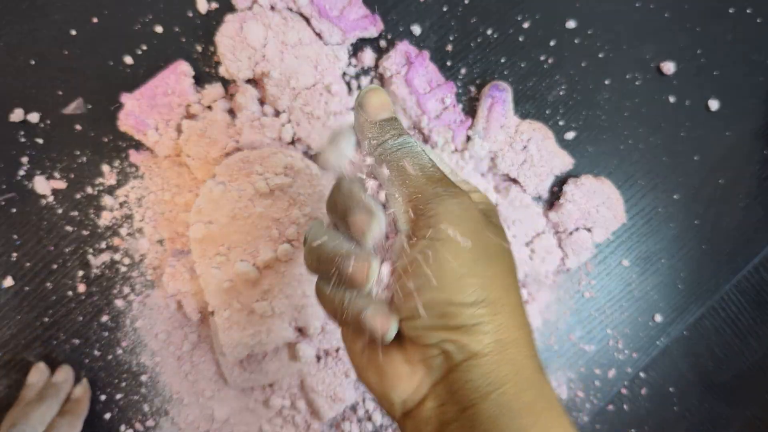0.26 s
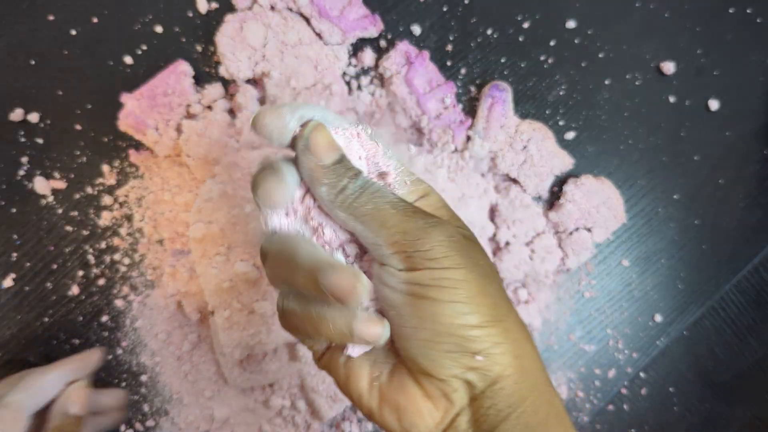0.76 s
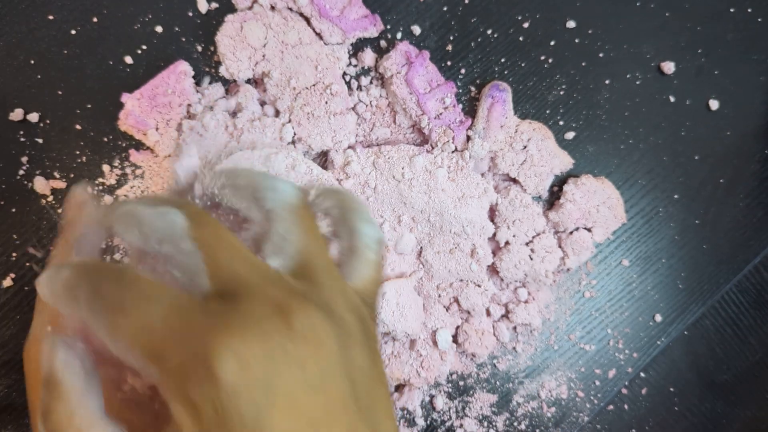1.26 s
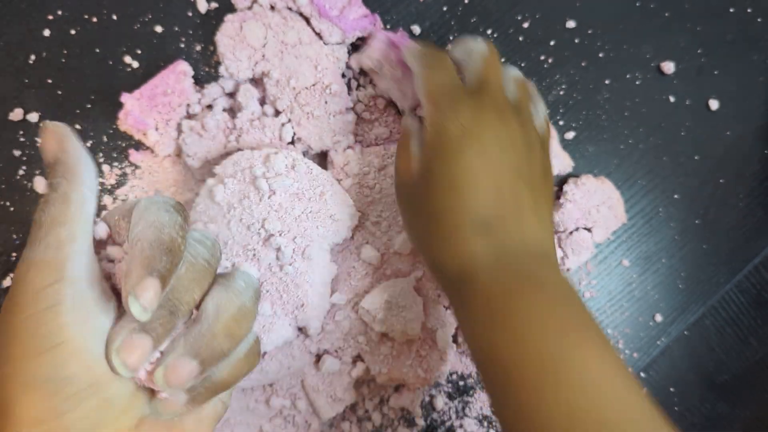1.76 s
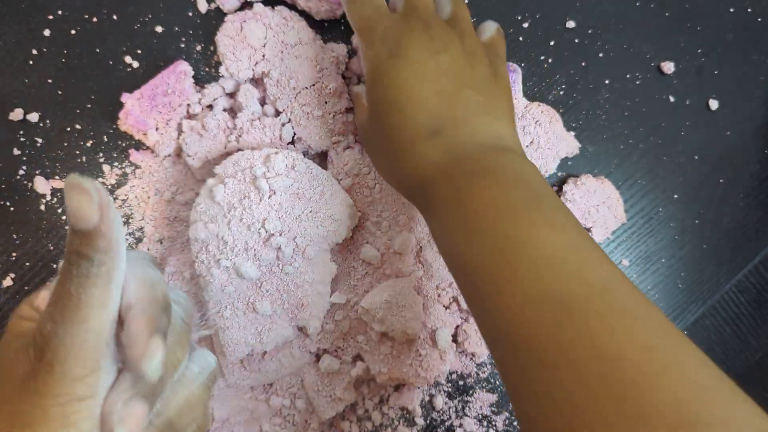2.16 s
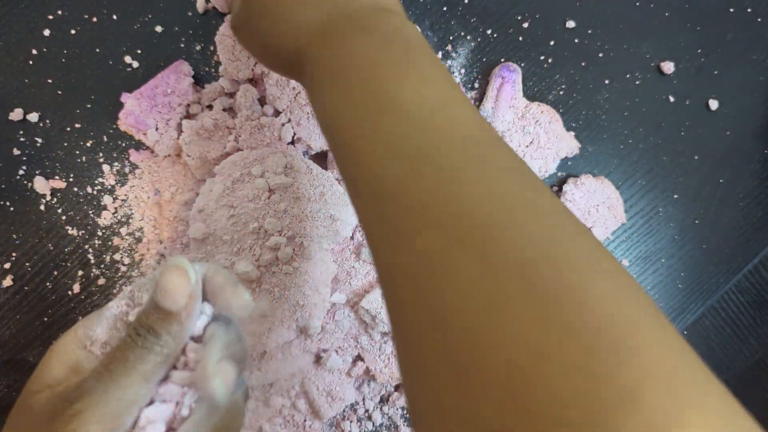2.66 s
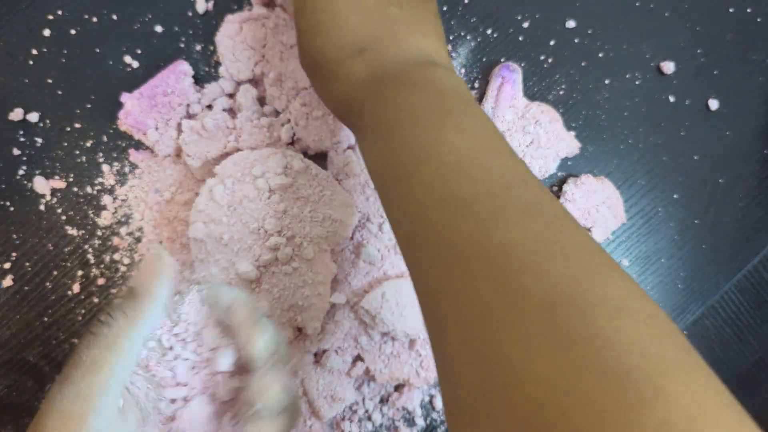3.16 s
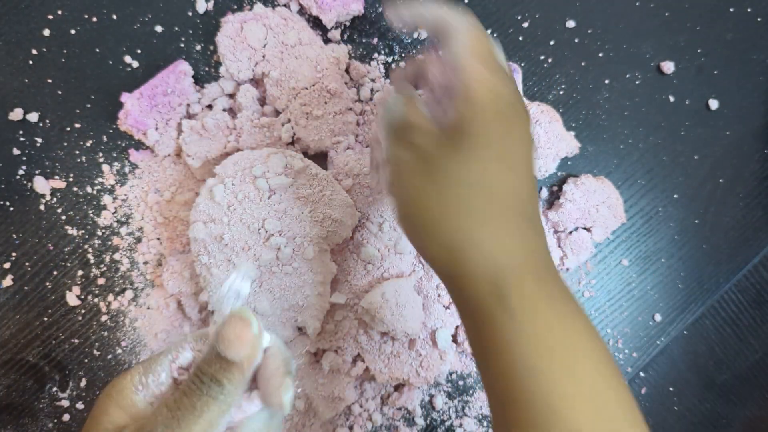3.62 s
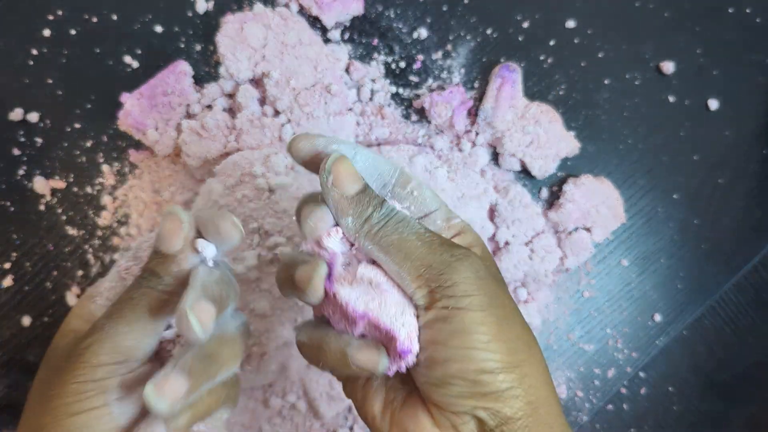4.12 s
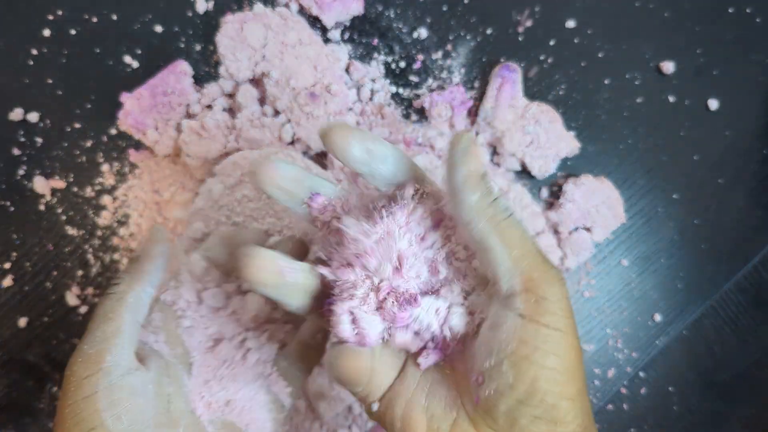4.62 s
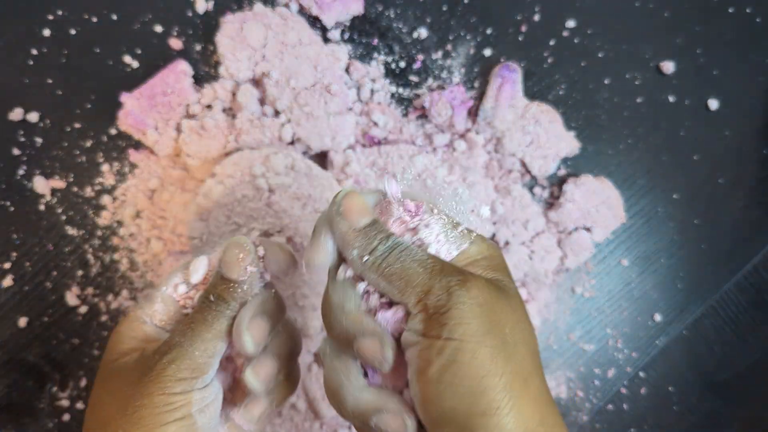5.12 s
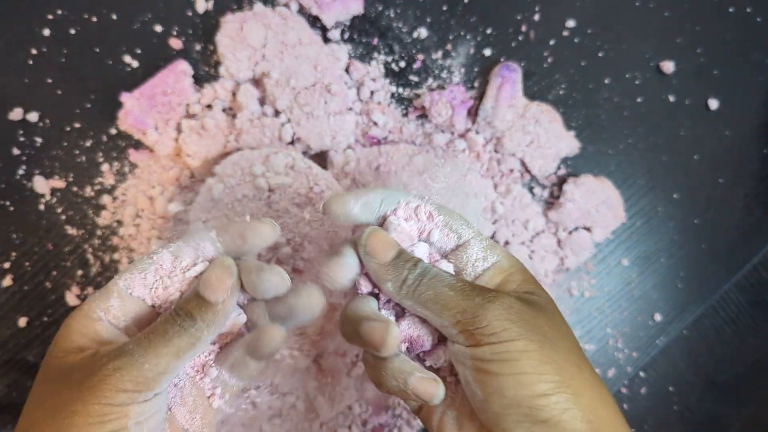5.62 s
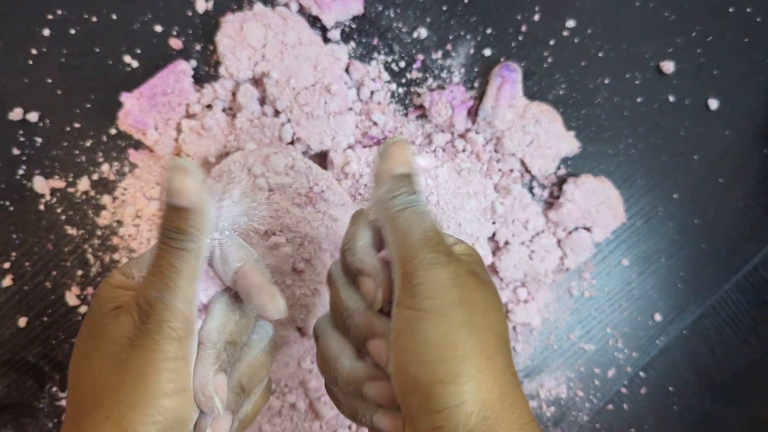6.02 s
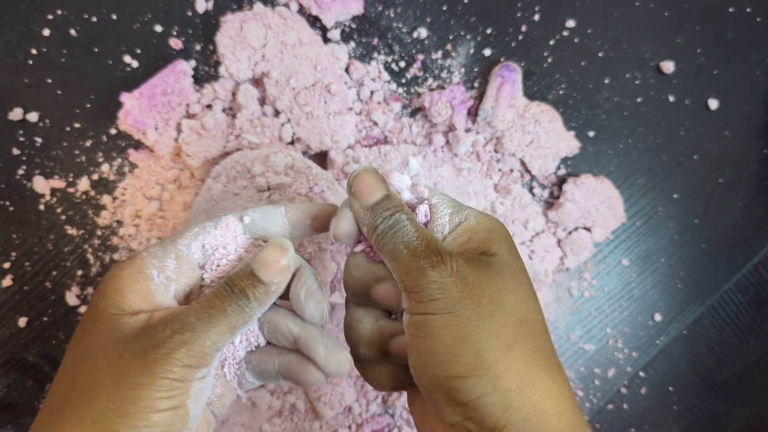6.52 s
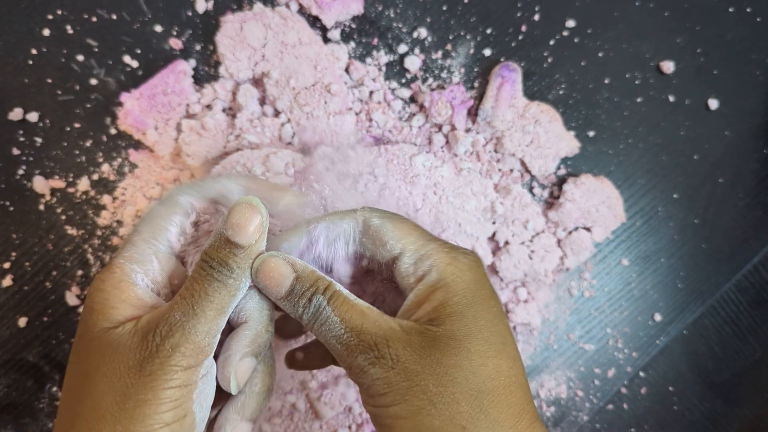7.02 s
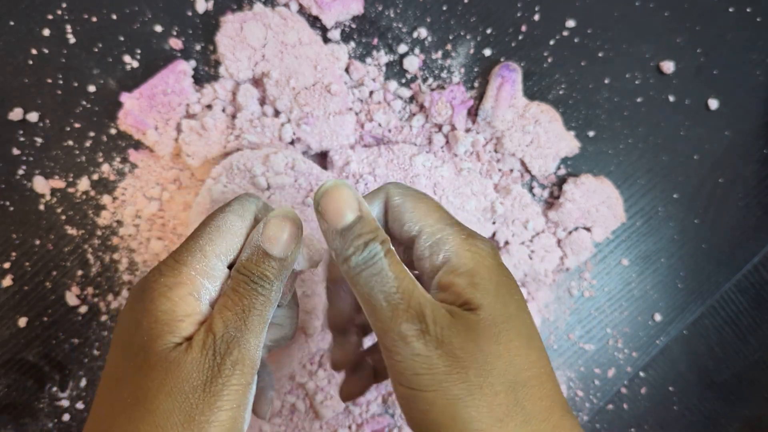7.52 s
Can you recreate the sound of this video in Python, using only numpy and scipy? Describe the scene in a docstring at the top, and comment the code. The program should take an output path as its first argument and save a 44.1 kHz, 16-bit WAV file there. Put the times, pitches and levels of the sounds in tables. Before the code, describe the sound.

Chalky chunks crack and crumble between fingers, heard very close and dry. Quick sharp crunches open the scene, then powder slides and the table thuds softly under hands. A new lump breaks with crisp, loud snaps and crumbs tick down. Squeezes continue as a granular, powdery crackle on and off, gradually thinner and quieter. Faint low room hum and soft hush lie beneath, with a very short indoor tail.

```python
"""Crushing dry powder by hand

Hands crush lumps of dry powder over a wooden table in a quiet room. Each lump gives way with crisp
snaps, then crumbles in a fine crackle while the powder rubs between the fingers: all random tiny clicks.
Crumbs tick; bumps and presses make the table thud and ring, built from filtered clicks and dying sines.
Behind it lie a low hum of wavering sines and a soft rush of filtered noise."""
import sys
import numpy as np
from scipy import signal
from scipy.fft import rfft, irfft, next_fast_len
from scipy.io import wavfile
from scipy.ndimage import uniform_filter1d, map_coordinates

SR = 44100
rng = np.random.default_rng(int(sys.argv[2]) if len(sys.argv) > 2 else 0)


def unload_audio(sound):
    """Save the sound as a 16-bit wav file, at the path given as the first command line argument."""
    columns = np.transpose(np.atleast_2d(sound))
    # keep every value between -1 and 1, then stretch to whole-number steps
    steps = np.round(np.clip(columns, -1, 1) * 32767)
    wavfile.write(sys.argv[1], SR, steps.astype(np.int16))


N = 343098  # length of the scene in samples


# Colours of the fine crackle and of the coarse rubbing.
# Each row: frequency in Hz, relative level in dB.
CRACKLE_COLOUR = [(800, -38), (2200, 2), (3500, 0.5), (4500, -0.5), (5500, -1), (6700, 2), (8300, 2),
                  (9700, -1), (11500, 0.5), (14000, -1.5), (16000, -10.5)]
RUBBING_COLOUR = [(100, -6), (210, -22.5), (345, 0), (440, -11), (600, -1.5), (850, 5), (1250, -1.5),
                  (1700, 1), (2200, -2.5), (3000, -6.5), (4500, -9), (9000, -19.5)]


def crumbling():
    """Squeezed powder breaks in clumps of micro-fractures and rubs between the fingers; small crumbs pop."""
    fine_gain, coarse_gain = squeezing()
    slips_db = 1.6 * wobble(80) + 0.28 * wobble(300)  # stick and slip
    dust = unit(amp(slips_db) * grains(rate=6000, spread_db=-0.5, size=N))
    rub_db = .5 * slips_db + 1.2 * wobble(110)
    rub = unit(amp(rub_db) * grains(rate=1800, spread_db=1.0, size=N))
    dust = nearby(dust, scatter_db=0.5, life=0.029)
    rub = nearby(rub, scatter_db=9.5, life=0.04)
    ticks = amp(-7) * chips(rate=400, hz=7000, octaves=.6, cycles=9, spread_db=4)
    pops = amp(-6.5) * chips(rate=480, hz=3000, octaves=.5, cycles=9, spread_db=4)
    breaking = unit(np.hypot(1, .7 * clumps(rate=170, life=.01, spread_db=3)))
    crackle = convolve(breaking * dust + ticks, colour(CRACKLE_COLOUR))
    rubbing = convolve(breaking * rub + pops, colour(RUBBING_COLOUR))
    crackle = shifting(crackle, depth_db=2.3)
    rubbing = shifting(rubbing, depth_db=2.4)
    return amp(1.0) * fine_gain * crackle + amp(-0.36) * coarse_gain * rubbing


# Squeezes of the hand. Each row: start in seconds, held for seconds, strength of the fine crackle in dB,
# coarse rubbing in dB over the crackle, swell in dB while held.
SQUEEZES = [(0.175, 0.036, -54, -16, 1), (0.25, 0.059, -50.5, 3.5, 2), (0.34, 0.1, -51.5, 1.5, 0.5),
            (0.45, 0.12, -58, 4.5, -7.5), (0.781, 0.16, -55, 0.5, -2), (0.98, 0.063, -57.5, 7.5, -2),
            (1.36, 0.115, -60, -6, -4), (1.53, 0.098, -55.5, 4.5, 6), (1.625, 0.07, -56.5, 9, -5.5),
            (1.709, 0.054, -54, 4.5, -6), (1.842, 0.056, -47.5, 7.5, -3.5), (1.91, 0.24, -63, 12, -13),
            (2.11, 0.2, -58.5, 7.5, 7.5), (2.62, 0.11, -65.5, 9, 4), (2.775, 0.16, -59, 8, 3.5),
            (2.89, 0.16, -53.5, 1, 4.5), (3.08, 0.093, -57.5, 9.5, 7), (3.346, 0.24, -57.5, 9, -5.5),
            (3.69, 0.11, -57, 3.5, -2), (4.074, 0.072, -55, -1.5, -1.5), (4.15, 0.28, -51.5, 1, 6),
            (4.56, 0.16, -62, 1.5, 1), (4.76, 0.18, -52, 0.5, -2), (4.96, .3, -55, 3.5, 0.5),
            (5.298, 0.11, -51.5, 1, -2), (5.44, 0.05, -58.5, 1.5, -0.5), (5.695, 0.15, -55, 0, 4.5),
            (5.885, 0.047, -51.5, 3.5, 1.5), (5.971, 0.092, -57, 7, 0.5), (6.135, 0.14, -63.5, 0.5, -11),
            (6.39, 0.077, -61, 5.5, 2.5), (6.475, 0.12, -56, 5, -2.5), (6.62, 0.088, -60, 4, 1),
            (6.71, 0.078, -58, 4.5, 1), (6.825, 0.043, -57.5, 5.5, -5.5), (7.019, 0.083, -55.5, -4.5, -1),
            (7.13, 0.13, -63, -7, -2), (7.28, 0.045, -62, -11, 2), (7.436, 0.011, -57, 0.5, -8)]
# Loose powder sliding in the relaxed hands between squeezes.
# Each row: time in seconds, strength of the fine crackle in dB.
LOOSE_POWDER = [(0, -68), (0.72, -69), (1.15, -69.5), (1.3, -67), (1.55, -58.5), (2.1, -62.5), (2.35, -60),
                (2.5, -73.5), (3.2, -60), (3.65, -56), (3.9, -64.5), (5.55, -65.5), (6.1, -65.5),
                (6.95, -63.5), (7.35, -69.5), (7.78, -74.5)]
LOOSE_RUB_DB = -1  # its coarse rubbing over its fine crackle


def squeezing():
    """Gains of the fine crackle and of the coarse rubbing; the strongest push rules at each moment."""
    fine, = gains(LOOSE_POWDER)
    coarse = amp(LOOSE_RUB_DB) * fine
    for s, hold, db, rub_db, swell_db in SQUEEZES:
        push = amp(db) * stroke(s, hold, swell_db)
        fine = np.maximum(fine, push)
        coarse = np.maximum(coarse, amp(rub_db) * push)
    return fine, coarse


ATTACK_S, RELEASE_S = 0.054, 0.1  # seconds for a push to build up, and to let go, by 30 dB


def stroke(s, hold, swell_db):
    """Gain of one push of the hand: a quick attack, a hold that swells or sags, a release."""
    t = np.arange(N) / SR - s
    held_db = swell_db * (np.clip(t / hold, 0, 1) - .5)
    outside = np.maximum(-t, 0) / ATTACK_S + np.maximum(t - hold, 0) / RELEASE_S
    return amp(held_db - 30 * np.minimum(outside, 4))


def chips(rate, hz, octaves, cycles, spread_db):
    """Small crumbs popping at random, rate a second, each dying within a few cycles at its own pitch."""
    draws = rng.standard_normal((int(rate * N / SR), 5))
    when, pitch, strength, lead, side = draws.T[:, :, None]
    start = ((when * N) % N).astype(int)
    pitch = np.clip(hz * 2 ** (octaves * pitch), SR / 80, SR / 3)
    n = np.arange(SR // 100)
    turns = pitch * n / SR
    fade = amp(spread_db * np.clip(strength, -2, 2) - 60 * turns / cycles)
    # each pop differs a little in level and phase between left (1) and right (-1)
    heard = [fade * amp(2 * ear * side) * np.sin(2 * np.pi * turns + ear * lead) for ear in (1, -1)]
    return unit(np.array([np.bincount((start + n).ravel(), pops.ravel(), N)[:N] for pops in heard]))


def clumps(rate, life, spread_db):
    """Gain of brittle bridges giving way, rate a second: each starts at once, dying by 60 dB in life s."""
    t = np.arange(SR // 20) / SR
    energy = convolve(grains(rate, spread_db, size=N) ** 2, amp(-60 * t / life) ** 2)
    return unit(np.sqrt(np.abs(energy)))


def shifting(x, depth_db):
    """Ever new fragments and hollows between the fingers favour ever new pitches for a moment."""
    z = signal.stft(x, nperseg=512)[2]
    field = uniform_filter1d(rng.standard_normal(z.shape[1:]), size=5, axis=0)  # smooth over pitch
    field = uniform_filter1d(field, size=4, axis=1)  # and over time
    return unit(signal.istft(z * amp(depth_db * unit(field)), nperseg=512)[1][:, :N])


# Lumps cracking. Each row: start in seconds, strength in dB, dull body in dB relative to that strength,
# pitch of the crack in Hz.
SNAPS = [(0.1684, -27.5, -8, 9500), (0.2428, -31, -0.5, 8000), (0.2707, -25.5, -3.5, 6960),
         (0.64, -43.5, -17, 5000), (1.3449, -36.5, -7.5, 6500), (1.3857, -35, -31, 9000),
         (1.416, -30, -36, 11000), (1.5201, -36, -0.5, 11000), (1.5459, -38, 1.5, 7500),
         (1.807, -37, 4.5, 11000), (1.9587, -40, 5, 12000), (2.0053, -35.5, -15, 11000),
         (2.4492, -52.5, 8, 5000), (2.4784, -52, 12, 6130), (2.746, -36, 1.5, 9000),
         (2.885, -39, 8.5, 8000), (3.1856, -36.5, 6, 8000), (3.321, -37.5, -20, 8000),
         (3.8555, -29.5, -15, 11500), (3.986, -33.5, -4.5, 10000), (4.143, -25, -3.5, 9000),
         (4.16, -28.5, -5.5, 8500), (4.238, -30.5, -2.5, 7000), (4.2903, -32, -1.5, 7500),
         (4.3188, -33.5, -22, 12500), (4.4189, -34, 1, 7500), (4.545, -45.5, 11.5, 6000),
         (4.6005, -37, -26, 7500), (4.6961, -27.5, -9, 6500), (4.777, -33.5, -1, 9500),
         (4.811, -35.5, -4, 8000), (4.9265, -32.5, 1.5, 7000), (5.1114, -35.5, 0.5, 8000),
         (5.362, -31, -18, 8500), (5.583, -45, 1.5, 6500), (5.6013, -38, -17, 12000),
         (6.229, -38, -25, 9050), (6.4417, -39, -20, 11000), (6.8287, -38.5, -14, 6500),
         (7.5932, -44.5, -2.5, 7000)]
# Colours of the sharp crack and of the dull crunch. Each row: frequency in Hz, relative level in dB.
SNAP_COLOUR = [(500, -45), (2000, -7.5), (4000, -8), (5500, -4.5), (8000, 2), (9700, -2), (12000, 1),
               (16000, -9)]
CRUNCH_COLOUR = [(80, -18), (300, -8), (800, -4), (2000, -1.5), (3200, -4.5), (6000, -10), (14000, -31)]
# A snap of strength CRUMBLE_AT_DB crumbles for CRUMBLE_S seconds, one CRUMBLE_DOUBLES_DB stronger twice that.
CRUMBLE_S, CRUMBLE_AT_DB, CRUMBLE_DOUBLES_DB = 0.078, -29, 35


def snaps():
    """A lump parts with a sharp pitched crack, then sheds a bright avalanche over a duller crunch."""
    bright, body = np.zeros((2, N))
    for s, db, body_db, hz in SNAPS:
        life = CRUMBLE_S * 2 ** ((db - CRUMBLE_AT_DB) / CRUMBLE_DOUBLES_DB)
        crack = burst(life=.009, rise=.0003, rate=25000, spread_db=1.5)
        avalanche = burst(life, rise=0.00062, rate=15000, spread_db=-6.5)
        tone = colour([(hz / 4, -7), (hz / 5.8, -5), (hz, 0), (hz * 2.0, -5), (hz * 4, -9)])
        parting = convolve(amp(db - 7.5) * (crack + amp(-8.0) * avalanche), tone)[0]
        crunch = burst(life, rise=0.00048, rate=13000, spread_db=-2.0)
        add(bright, s, parting)
        add(body, s, amp(db + body_db - 10.5) * crunch)
    sharp = convolve(nearby(bright, scatter_db=0.5, life=0.0099), colour(SNAP_COLOUR))
    dull = convolve(nearby(body, scatter_db=2.5, life=0.0084), colour(CRUNCH_COLOUR))
    return sharp + dull


# Dead taps of falling crumbs and of fingers. Each row: start in seconds, strength in dB, pitch in Hz.
CRUMBS = [(1.519, -36.5, 680), (1.675, -28.5, 1420), (2.55, -37.5, 2010), (4.547, -32, 952),
          (4.6304, -34, 1100), (4.641, -38.5, 1140), (4.675, -38.5, 2500), (4.703, -23, 2850),
          (4.717, -32, 1500), (4.7413, -23.5, 1090), (4.806, -27.5, 2940), (5.162, -33, 2270),
          (5.385, -34.5, 1600), (5.659, -36.5, 980), (6.2041, -26.5, 774), (6.206, -27.5, 320),
          (6.262, -36.5, 1010), (6.4731, -34, 2520), (6.52, -38, 1490), (6.778, -40, 1830),
          (7.276, -36, 340), (7.733, -45.5, 1560)]


def crumbs():
    """A dry, dead tick, lower for a bigger and softer piece, with a little shed dust."""
    track = np.zeros((2, N))
    for s, db, hz in CRUMBS:
        landing = burst(life=.022, rise=.0002, rate=20000, spread_db=1)
        dust = burst(life=.08, rise=.0015, rate=4000, spread_db=2.5)
        tone = colour([(hz / 5, -17), (hz / 1.9, -5), (hz, 0), (hz * 1.41, -6),
                       (hz * 3, -17), (hz * 8, -26), (hz * 25, -48)])
        tick = convolve(nearby(landing + amp(-7.5) * dust, scatter_db=1.5, life=0.0074), tone)
        add(track, s, amp(db - 8.5) * tick)
    return track


# Faint pitched ticks. Each row: start in seconds, strength in dB.
TINKS = [(7.008, -51.5), (7.274, -50), (7.429, -55)]
# The tones in each tick. Each row: pitch in Hz, relative level in dB, seconds to fade by 60 dB.
TINK_MODES = [(2490, 1.5, 0.051), (4820, 4, 0.029)]


def tinks():
    """Faint pitched ticks: a few sines that die away at once."""
    track = np.zeros(N)
    for s, db in TINKS:
        add(track, s, amp(db) * ring(TINK_MODES))
    return track


# Hands and lumps bumping. Each row: start in seconds, strength in dB, deep thump in dB and table ring in dB
# (both relative to that strength), crumbling time in seconds, freely ringing pitch in Hz.
BUMPS = [(0.802, -46.5, 6, -6, 0.46, 480), (1.8055, -27.5, 2, -10.5, 0.11, 840),
         (1.844, -43, 11, -15, 0.16, 560), (1.905, -27, -18, -7.5, 0.12, 1330),
         (1.961, -29.5, -12, -14, 0.079, 380), (2.262, -38.5, 1, -6, 0.21, 860),
         (2.747, -33.5, -4, 1.5, 0.11, 720), (3.186, -27, -11, -3, 0.066, 730),
         (3.59, -46, -13, 6.5, 0.12, 670), (3.799, -47, -2.5, -12, 0.061, 1690),
         (4.741, -34, -18, -19, 0.12, 1690), (6.205, -33.5, -15, -17, 0.032, 770),
         (7.277, -46, -4, -1, 0.044, 365)]
# Powder ground against the table top under the hands. Each row: start in seconds, held for seconds,
# strength in dB, table ring in dB over it, swell in dB while held, freely ringing pitch in Hz.
PRESSES = [(1.845, 0.036, -40, 2, -3, 850), (1.89, 0.075, -37.5, 1.5, -10.5, 1450),
           (1.985, 0.05, -46, -1, 4, 1190), (2.279, 0.033, -43, 3, -7, 700), (2.79, 0.12, -50, 5.5, 1, 370),
           (2.95, 0.13, -56, 9.5, 4.5, 700), (3.205, 0.014, -41.5, 2, -19, 240),
           (3.25, 0.08, -51.5, 4.5, -12, 710), (3.35, 0.13, -49.5, 9, -2.5, 1400),
           (3.52, 0.05, -55, 7, 3, 710), (3.595, 0.018, -47, -5, -15, 630),
           (5.69, 0.17, -59, -1.5, -6, 365), (7.0, 0.51, -60.5, 3, -8.5, 365)]
# Colour of the thud. Each row: frequency in Hz, relative level in dB.
THUD_COLOUR = [(30, -14), (70, 6), (130, 7.5), (200, -2.5), (350, 2.5), (900, -1), (1400, -8), (2400, -9),
               (3500, -40), (9000, -37)]


def table():
    """Bumps and grinding powder thud and shake the table top; heavy pushes rock its lowest modes."""
    force, ringing = np.zeros(N), np.zeros((2, N))

    def shaken(drive, wood):
        """The wood rings on under a run of small knocks."""
        return convolve(nearby(drive, scatter_db=3.0, life=0.011), wood / np.linalg.norm(wood[0]))

    for s, db, deep_db, ring_db, life, free_hz in BUMPS:
        blow = amp(db - 7.0) * burst(life, rise=0.00096, rate=11000, spread_db=1.0)
        wood = top(free_hz)
        thump = ring([(54.2, 0, 0.46), (124, -3, 0.12)])
        add(force, s, blow)
        add(ringing, s, amp(ring_db - 3.0) * shaken(blow, wood))
        add(ringing, s, amp(db + ring_db - 6.0) * wood)
        add(ringing, s, amp(db + deep_db - 7.5) * thump)
    grind = unit(amp(3.2 * wobble(70)) * grains(rate=1300, spread_db=2.0, size=N))
    pressure = np.zeros(N)
    for s, hold, db, ring_db, swell_db, free_hz in PRESSES:
        push = amp(db) * stroke(s, hold, swell_db)
        pressure = np.maximum(pressure, push)
        start = s - 2 * ATTACK_S  # include the build-up of the push
        drive = (push * grind)[round(start * SR):][:SR]
        add(ringing, start, amp(ring_db - 8.0) * shaken(drive, top(free_hz)))
    force += amp(-4.5) * pressure * grind
    thud = convolve(nearby(force, scatter_db=0.0, life=0.013), colour(THUD_COLOUR))
    return amp(3.0) * thud + ringing


# Ways the table top rings, before the hand damps and detunes them.
# Each row: pitch in Hz, relative level in dB, seconds to fade by 60 dB.
TABLE_MODES = [(57, -9.5, 0.6), (121.5, -14, 0.28), (159.5, -4.5, 0.28), (240.3, 0.5, 0.19),
               (369, -1.5, 0.31), (554, -11, 0.23), (665.6, -7.5, 0.2), (699.4, -2, 0.26),
               (862, -7.5, 0.13), (1018, -2, 0.13), (1152, -10.5, 0.16), (1330, -5, 0.15), (1530, -8, 0.19),
               (1670, -14, 0.2)]
# A hand damps the top but leaves modes near one pitch free:
# their gain in dB, their range in octaves, the share of ring time left to the others.
FREE_DB, FREE_OCTAVES, DAMPED_SHARE = 5.5, 0.19, 0.76


def top(free_hz):
    """Ring under one contact: the hand damps and detunes modes; each reaches the microphones differently."""
    t = np.arange(SR // 2) / SR
    hz, db, t60 = np.transpose(TABLE_MODES)[:, :, None]
    free = np.exp(-(np.log2(hz / free_hz) / FREE_OCTAVES) ** 2)
    level, detune, lead = rng.standard_normal((3, len(TABLE_MODES), 1))
    life = t60 * (DAMPED_SHARE + (1 - DAMPED_SHARE) * free)
    fade = amp(db + FREE_DB * free + 2 * level - 60 * t / life)
    turns = hz * (1 + .008 * detune) * t
    return np.array([np.sum(fade * np.sin(2 * np.pi * turns + ear * 0.5 * lead), axis=0) for ear in (1, -1)])


# How the room carries on a sound. Each row: frequency in Hz, seconds to fade by 60 dB.
ROOM_DECAY = [(100, 0.26), (1000, 0.3), (5000, 0.18), (15000, 0.088)]


def room(x):
    """A small room's tail: noise that fades faster in the treble, starting 5 ms late."""
    hz, t, z = signal.stft(rng.standard_normal((2, SR // 3)), SR, nperseg=256)
    fade = amp(-60 * t / along(ROOM_DECAY, hz)[:, None])
    tail = signal.istft(z * fade, SR, nperseg=256)[1]
    return convolve(x, np.pad(tail / np.linalg.norm(tail[0]), ((0, 0), (SR // 200, 0))))


# Colour of the quiet rush. Each row: frequency in Hz, relative level in dB.
HUSH_COLOUR = [(25, -20.5), (55, 9.5), (150, 7.5), (215, -16), (340, -4), (470, -15.5), (750, -13),
               (1500, -25.5), (6000, -23.5), (16000, -55)]
# Tones of the low hum. Each row: pitch in Hz, relative level in dB.
HUM_TONES = [(57, 1), (114, -9.5)]
# Strength of the low hum over time. Each row: time in seconds, relative level in dB.
HUM_LEVEL = [(0, -60), (.3, -52), (1.1, -53), (2.6, -57), (3.1, -51), (4.5, -74), (4.85, -53.5),
             (7.35, -53), (7.78, -60.5)]


def background():
    """A hum of sines wavering in level and phase, over the soft, uneven noise of the room."""
    shared, separate = rng.standard_normal(N), rng.standard_normal((2, N))
    noise = amp(1.1 * wobble(9)) * (shared + 0.76 * separate)
    t = np.arange(N) / SR
    hum = np.zeros(N)
    for hz, db in HUM_TONES:
        hum += amp(db + 3.5 * wobble(13)) * np.sin(2 * np.pi * hz * t + 0.9 * wobble(7.2))
    return amp(-62.5) * convolve(noise, colour(HUSH_COLOUR)) + amp(-6.5) * gains(HUM_LEVEL)[0] * hum


def grains(rate, spread_db, size):
    """Tiny fractures at random moments, rate a second, with scattered strengths."""
    happens = rng.random(size) < rate / SR
    strength = amp(spread_db * np.clip(rng.standard_normal(size), -2, 2))
    return unit(happens * strength * np.sign(rng.standard_normal(size)))


def burst(life, rise, rate, spread_db):
    """An avalanche of fractures that dies by 60 dB in life seconds."""
    t = np.arange(SR // 3) / SR
    shape = (1 - np.exp(-t / rise)) * amp(-60 * t / max(life, rise))
    return shape / shape.max() * grains(rate, spread_db, size=len(t))


def nearby(x, scatter_db, life):
    """Each fracture sits elsewhere, so palms and table smear it anew on the way to each microphone."""
    t = np.arange(SR // 25) / SR
    fade = amp(-60 * t / life) ** 2
    lingering = np.sqrt(np.abs(convolve(x ** 2, fade / fade.sum())))
    share = amp(scatter_db)
    return (x + share * lingering * rng.standard_normal((2, x.shape[-1]))) / np.hypot(1, share)


def ring(modes):
    """Damped sines after one tap."""
    t = np.arange(SR // 2) / SR
    return sum(amp(db - 60 * t / t60) * np.sin(2 * np.pi * hz * t) for hz, db, t60 in modes)


def amp(db):
    """Decibels to gain."""
    return 10 ** (np.asarray(db) / 20)


def unit(x):
    """Scale to rms 1."""
    return x / np.sqrt(np.mean(x ** 2) + 1e-20)


def along(points, hz):
    """Read (Hz, value) points on a log axis."""
    f, v = np.transpose(points)
    return np.interp(np.log(hz + 1), np.log(f), v)


def gains(rows):
    """One gain per sample for each dB column of a curve."""
    s, *cols = np.transpose(rows)
    return [amp(np.interp(np.arange(N) / SR, s, c)) for c in cols]


def wobble(rate):
    """A smooth random curve, rate knots a second."""
    return map_coordinates(rng.standard_normal(int(N * rate / SR) + 4), [np.arange(N) * rate / SR])


def convolve(x, response):
    """Pass x through an impulse response, keeping its length."""
    return signal.fftconvolve(np.atleast_2d(x), np.atleast_2d(response), axes=1)[:, :x.shape[-1]]


def colour(spectrum, size=4096):
    """Impulse response of energy 1 with the given spectrum, never sounding before its cause."""
    cep = irfft(np.log(amp(along(spectrum, np.fft.rfftfreq(size, 1 / SR)))))
    cep[1:size // 2] *= 2  # fold the cepstrum forward in time: minimum phase
    cep[size // 2 + 1:] = 0
    response = irfft(np.exp(rfft(cep)))
    return response / np.linalg.norm(response)


def add(track, s, sound):
    """Mix a sound into a track at time s."""
    part = track[..., max(round(s * SR), 0):][..., :sound.shape[-1]]
    part += sound[..., :part.shape[-1]]


def scene():
    """Powder in the hands, the table under them and the room around."""
    hands = crumbling() + snaps() + crumbs() + tinks()
    hands = hands * amp([[.4], [-.4]])  # slightly to the left
    close = hands + table() * amp([[-.8], [.8]])  # table slightly to the right
    return close + amp(-7.5) * room(close) + background()


TOP_HZ = 16100  # nothing is heard from this frequency up


def record(dry):
    """Two close microphones hear the bass almost alike; deep rumble and the highest treble are cut."""
    size = next_fast_len(N + SR // 4)
    hz = np.fft.rfftfreq(size, 1 / SR)
    rumble_cut = signal.butter(6, 42, "highpass", fs=SR, output="sos")
    left, right = rfft(signal.sosfilt(rumble_cut, dry), size)
    mid = (left + right) / 2
    width_db = along([(120, -9.0), (270, -7.0), (1000, -0.5), (8000, 3.0)], hz)
    side = (left - right) / 2 * amp(width_db)
    return irfft(np.array([mid + side, mid - side]) * (hz < TOP_HZ), size)[:, :N]


dry = scene()
out = record(dry)
unload_audio(out)
```